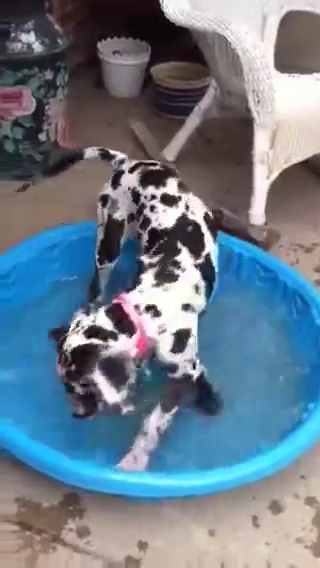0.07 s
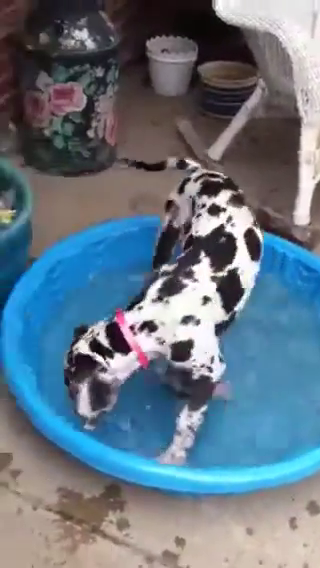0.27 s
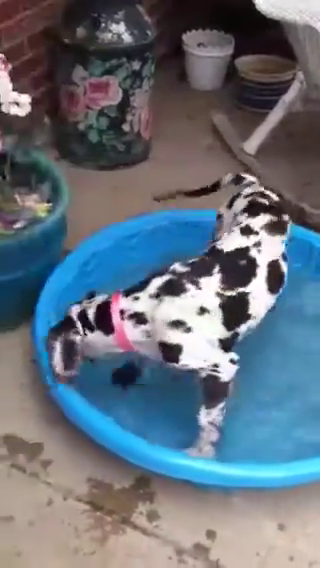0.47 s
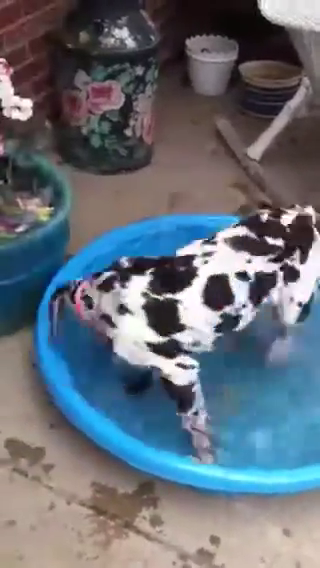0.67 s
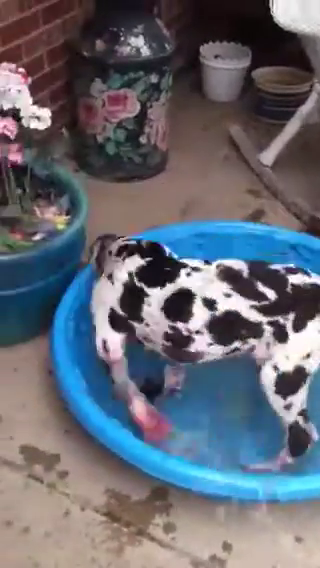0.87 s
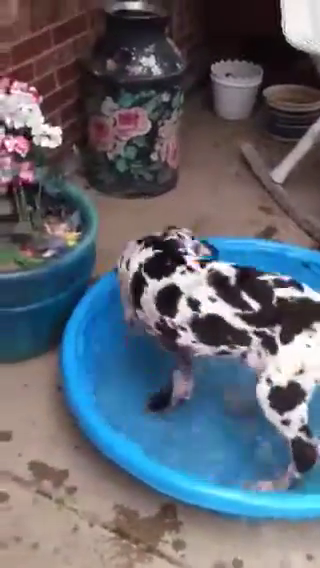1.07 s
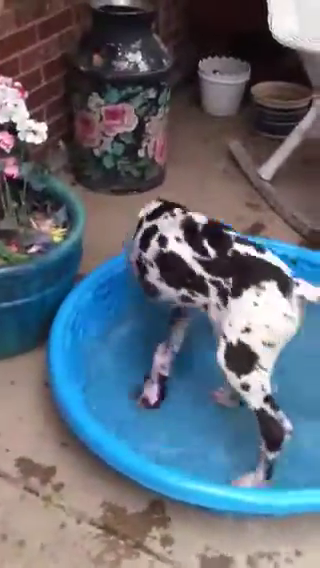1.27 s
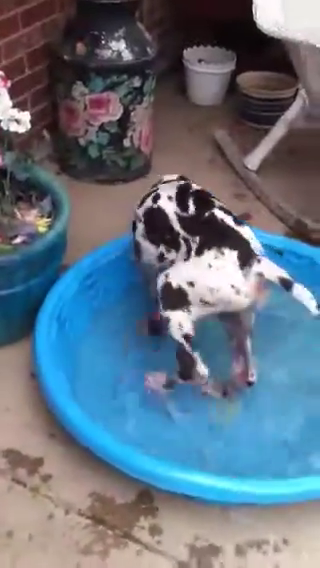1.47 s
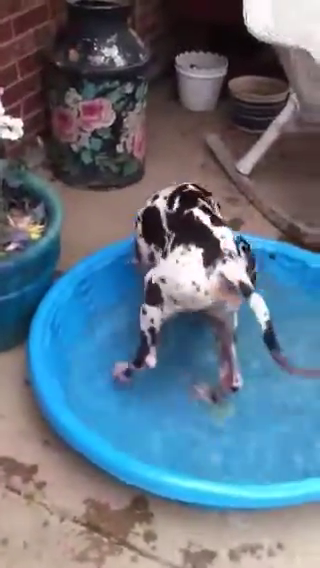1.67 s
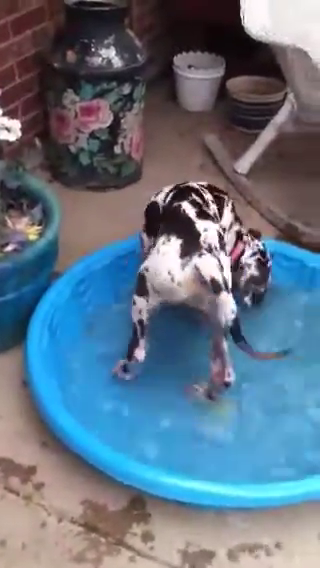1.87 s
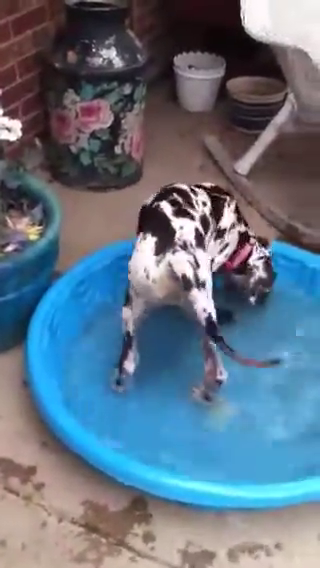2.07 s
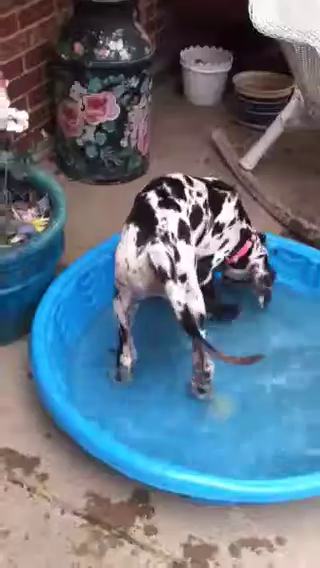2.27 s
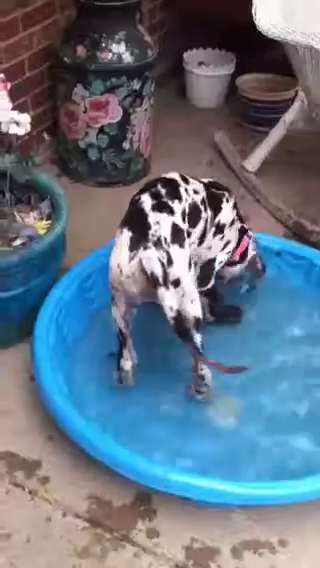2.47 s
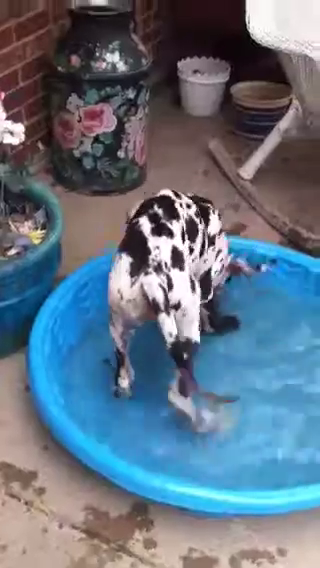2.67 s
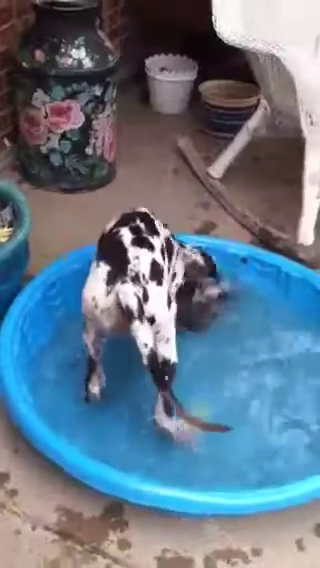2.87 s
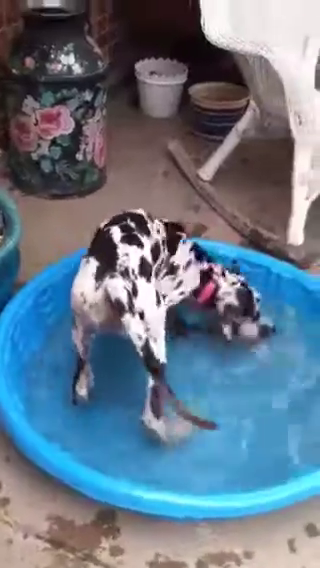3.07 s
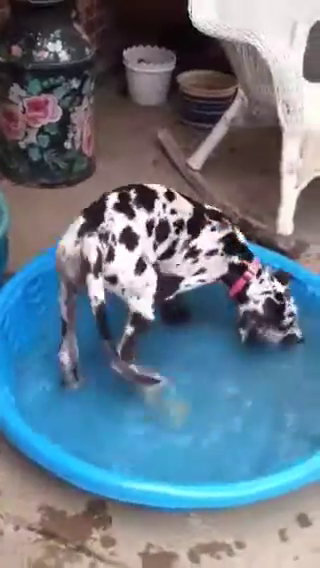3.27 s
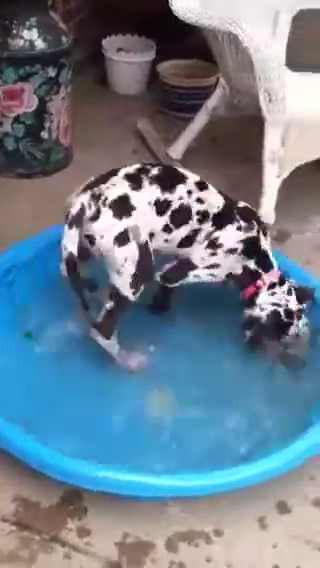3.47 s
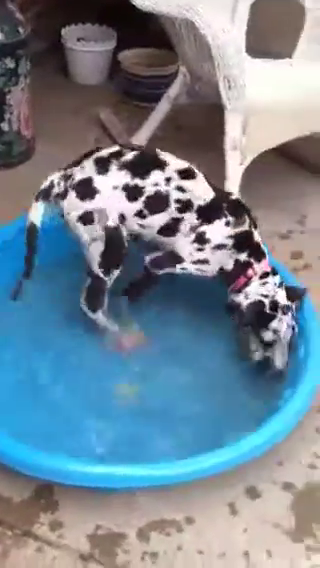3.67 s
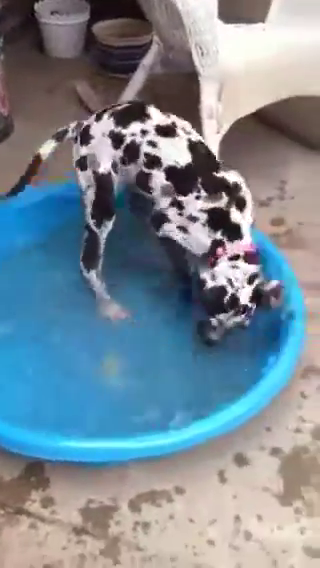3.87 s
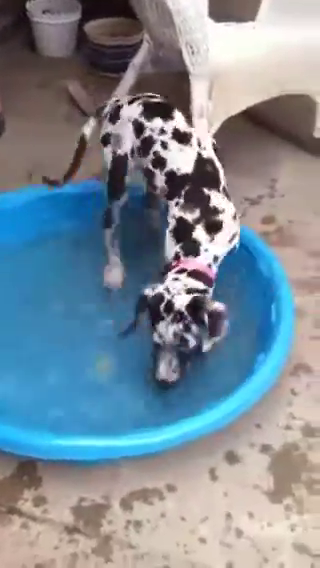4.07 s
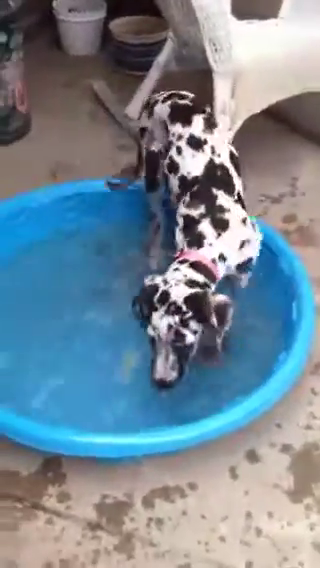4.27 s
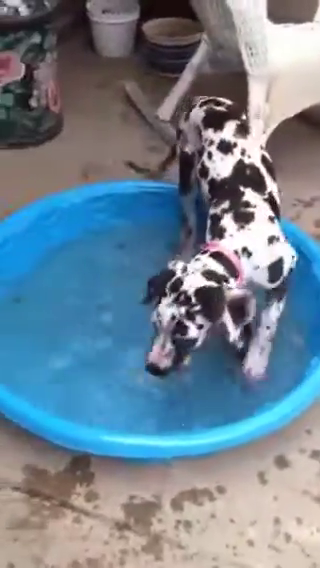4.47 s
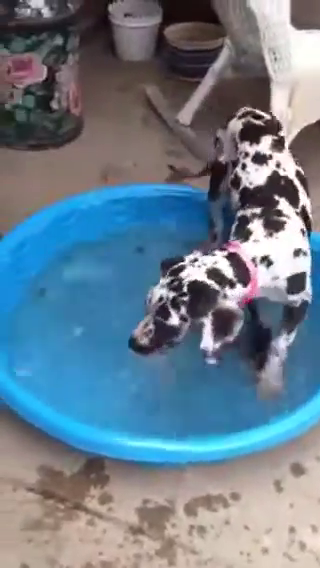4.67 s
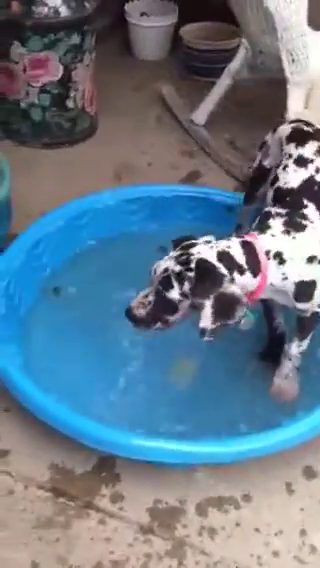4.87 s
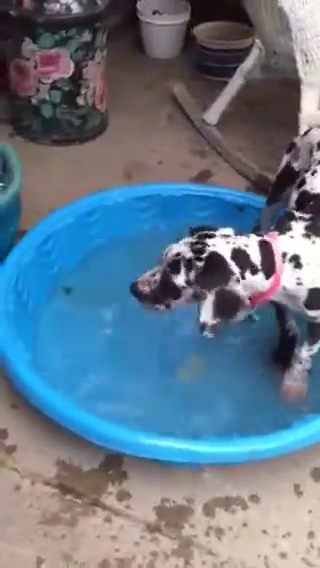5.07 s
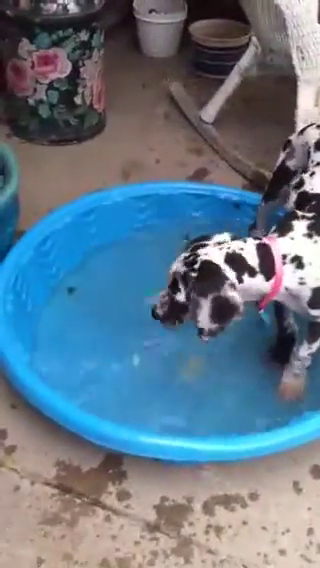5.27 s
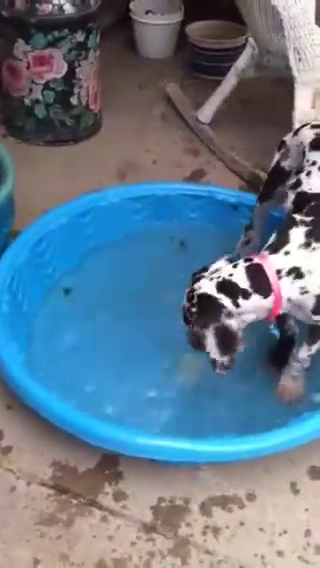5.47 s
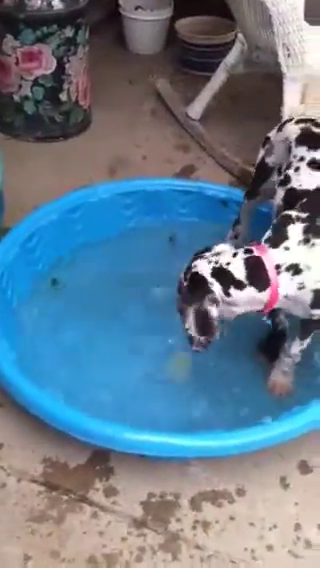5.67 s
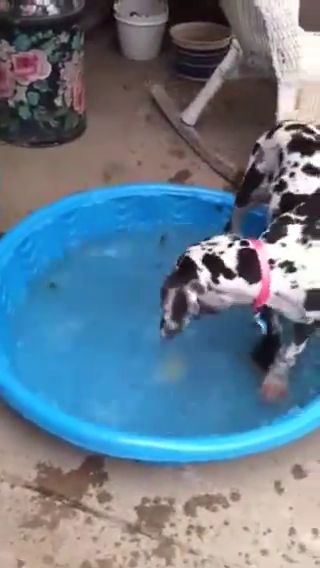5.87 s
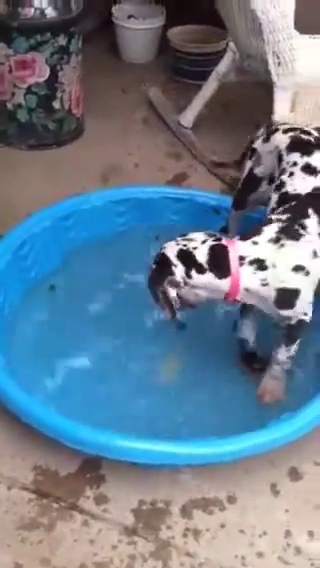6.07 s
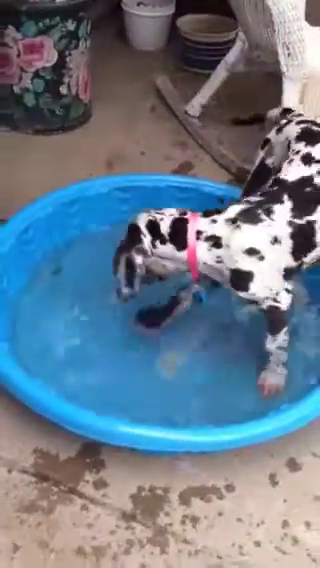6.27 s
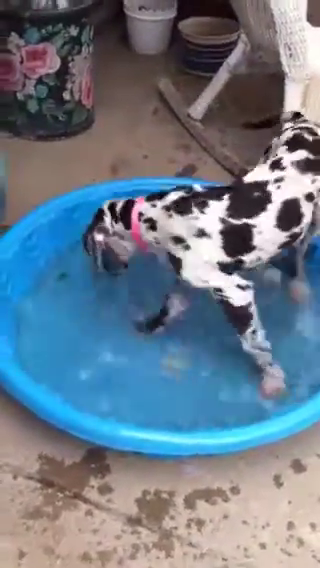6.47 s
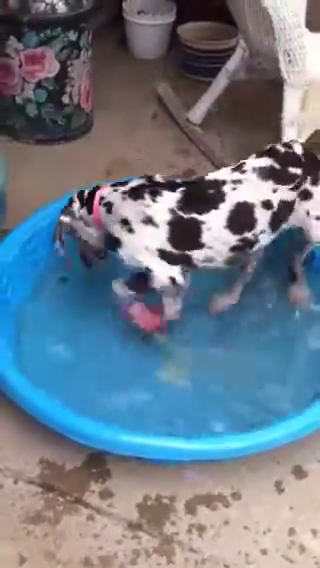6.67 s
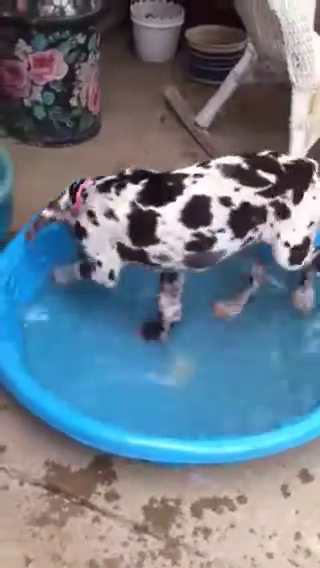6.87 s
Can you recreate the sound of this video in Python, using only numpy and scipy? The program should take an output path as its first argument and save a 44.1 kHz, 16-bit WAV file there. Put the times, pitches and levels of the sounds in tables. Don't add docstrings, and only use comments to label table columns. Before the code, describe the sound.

A dog paws and wades in a shallow plastic pool, wet slaps, bubbling gurgles and hollow tub booms, then quiet drips and one last slap.

```python
import sys
import numpy as np
from scipy import signal
from scipy.fft import rfft, irfft, next_fast_len
from scipy.io import wavfile
from scipy.ndimage import uniform_filter1d, map_coordinates

SR = 44100
rng = np.random.default_rng(int(sys.argv[2]) if len(sys.argv) > 2 else 0)


def magnitude_from_level(level_db):
    exponent = np.asarray(level_db, float) / 20
    return 10 ** exponent


def inscribe(sig):
    pcm = np.round(np.clip(np.atleast_2d(sig).T, -1, 1) * 32767)
    wavfile.write(sys.argv[1], SR, pcm.astype(np.int16))


N = 305613

# start in seconds, hiss level in dB, body over the hiss in dB,
# 60 dB decay in ms.
SLAPS = [(0.0672, -38, 3.5, 53), (0.316, -59.5, 16.5, 120), (0.666, -59, 13, 430), (0.677, -42, -5, 39),
         (0.895, -44, -9, 100), (1.003, -46, 3, 100), (1.2366, -42, -0.5, 77), (1.3696, -46.5, 4, 27),
         (1.3913, -44.5, 5.5, 170), (1.5234, -58, 3.5, 440), (1.6641, -48, -3, 62), (1.716, -57, 13, 98),
         (1.7943, -44, -0.5, 120), (2.0518, -48.5, 1, 39), (2.898, -47, 6, 110), (3.11, -44, 5.5, 30),
         (3.4395, -35.5, -14, 117), (3.474, -41.5, 15, 71), (3.542, -55, 28, 16), (3.844, -48, -10, 87),
         (4.0027, -45, -5, 110), (4.208, -39.5, -14, 164), (4.344, -52.5, 2.5, 230), (5.015, -53, 4.5, 31),
         (5.4731, -60.5, 0, 190), (6.389, -44, -1, 140), (6.5279, -39, 1.5, 86), (6.543, -31, -2.5, 22)]
# start in seconds, hiss level in dB.
PATS = [(0.056, -41), (0.187, -42.5), (0.4773, -54), (0.8768, -42.5), (1.144, -48), (1.6125, -51.5),
        (1.684, -48), (1.869, -47), (3.176, -50), (3.2568, -50), (3.7174, -47), (4.1852, -52), (4.219, -53),
        (4.506, -46.5), (4.61, -49), (4.704, -54), (4.9648, -50.5), (6.793, -50.5)]
PAT_BODY_DB, PAT_T60_MS = 6, 36.7
# start in seconds, hiss level in dB.
SPECKS = [(1.141, -45), (1.5229, -52), (1.5345, -50), (1.978, -60), (2.0532, -48), (4.931, -50),
          (4.975, -52), (5.0287, -55), (5.043, -55), (5.179, -54), (5.209, -53)]
SPECK_BODY_DB, SPECK_T60_MS = -9, 6.7
CRACK_DB, CRACK_T60_MS = -4.5, 8.4
POP_DB, POP_BODY_DB, POP_T60_MS = -35.5, 10, 53

# start in seconds, peak level in dB, pitch in Hz,
# 60 dB decay in ms.
RISING = [(0.089, -33.5, 1390, 7.6), (0.693, -34, 1380, 3.5), (0.8626, -31, 2620, 1.3),
          (1.074, -44, 2270, 9), (1.276, -31, 1980, 4.8), (2.4194, -35.5, 600, 45), (2.427, -37.5, 913, 57),
          (2.695, -36, 800, 1.3), (2.739, -39, 1990, 12), (2.7608, -36.5, 814, 11),
          (3.264, -37.5, 1080, 36), (3.4123, -29.5, 810, 20), (3.6678, -28.5, 700, 17),
          (3.788, -37, 2160, 8), (3.844, -32.5, 1140, 13), (3.8665, -28, 1075, 35), (4.012, -28, 1120, 11),
          (4.109, -35.5, 1135, 30), (4.2068, -32, 1120, 18), (4.647, -42.5, 1020, 5.2),
          (4.7225, -38.5, 2500, 11), (4.826, -42.5, 1860, 12), (4.882, -32.5, 1080, 15),
          (4.904, -33.5, 2000, 18), (4.967, -39, 1400, 29), (6.529, -40.5, 950, 57),
          (6.5435, -19, 3020, 0.81), (6.608, -27.5, 1053, 26), (6.671, -42.5, 1400, 34),
          (6.677, -45.5, 1895, 45), (6.85, -44.5, 718, 38)]
# start in seconds, peak level in dB, pitch in Hz,
# 60 dB decay in ms.
HELD = [(0.262, -44.5, 1180, 41), (0.464, -45.5, 1250, 29), (0.897, -34, 1560, 11), (1.6113, -31, 777, 40),
        (1.72, -40, 2300, 35), (2.04, -34.5, 1290, 9.1), (2.0873, -31.5, 930, 3.3), (2.2872, -33, 935, 11),
        (2.3596, -41.5, 1060, 30), (2.5734, -37, 890, 3.6), (2.6026, -32.5, 800, 47),
        (2.9196, -37.5, 1265, 24), (3.1542, -32.5, 1016, 37), (3.3377, -25, 730, 21),
        (3.4277, -30, 815, 49), (3.5088, -27, 804, 69), (3.5334, -23, 1380, 4.7), (4.2079, -31, 737, 110),
        (4.3453, -32.5, 1070, 4.8), (4.3898, -40, 1980, 21), (4.589, -35, 2240, 4.9),
        (4.7536, -46, 2210, 45), (4.8002, -47.5, 1034, 53), (5.027, -46, 2380, 18), (5.0422, -42, 2150, 11),
        (6.622, -38, 1120, 34), (6.629, -40, 1120, 18), (6.701, -40, 1150, 27), (6.866, -53, 900, 100)]
# start in seconds, peak level in dB, pitch in Hz,
# 60 dB decay in ms.
SINKING = [(0.0695, -35, 1405, 20), (0.3226, -38, 1510, 24), (0.3229, -29, 2670, 0.85),
           (1.2751, -33, 920, 30), (1.515, -41, 2080, 44), (1.6124, -44, 2370, 24), (1.689, -45, 1390, 28),
           (2.7888, -31.5, 1335, 20), (2.8425, -29, 507, 6.1), (3.256, -37, 870, 22),
           (3.3676, -29, 750, 34), (3.4756, -28.5, 740, 26), (3.604, -24.5, 890, 14),
           (3.7138, -32, 1130, 18), (3.9865, -29, 900, 20), (6.2275, -46, 1720, 19),
           (6.3964, -29, 3380, 5.3), (6.6869, -42.5, 2180, 4.3), (6.7983, -37.5, 1700, 2.9)]
GLIDES = [20.3, -0.29, -10]
SWELL_CYCLES = 3.4
# start
# in seconds, peak level in dB, pitch in Hz.
DRIPS = [
    (5.456, -47, 4280),
    (5.74, -51, 1300),
    (5.763, -53, 1920),
    (6.083, -48.5, 4210),
    (6.108, -46.5, 1630),
    (6.173, -49, 1500),
    (6.267, -48, 3060),
    (6.283, -45.5, 5170),
    (6.352, -50, 2880),
         (6.2284, -40, 6560),
]
# start in seconds, peak level in dB, pitch in Hz.
DROPLETS = [(0.0655, -42, 3500), (0.0685, -40, 3060.0), (0.1888, -40, 3300), (0.3366, -44, 3700),
            (0.5065, -43, 4390.0), (0.6795, -42, 5430.0), (0.6917, -44, 3250), (0.6926, -41, 6200),
            (1.3709, -40, 5170), (1.3977, -42, 4050), (1.398, -42, 3550), (1.5344, -45.5, 3200),
            (1.6165, -42, 3050), (1.7351, -43, 3570), (1.7953, -42, 5900), (1.871, -43, 2380),
            (1.9948, -52, 6830), (2.2121, -54, 2060), (2.6022, -45, 1970), (2.7239, -46, 3340),
            (3.1373, -38.5, 3640), (3.1513, -37.5, 2160), (3.2573, -41.5, 4430), (3.448, -36, 5760),
            (3.4746, -34, 3480), (3.6517, -39.5, 2410.0), (3.8463, -37.5, 4340), (4.0022, -32.5, 2080),
            (4.0045, -37, 6330.0), (4.0055, -31, 5180), (4.0804, -39, 6240), (4.21, -41, 6850.0),
            (4.2199, -38.5, 3460), (4.2201, -38, 5250), (4.2207, -37, 2230), (4.3454, -44, 4200),
            (4.3952, -41.5, 3400), (4.6533, -46.5, 4260.0), (4.6827, -47, 3570.0), (4.7803, -48.5, 3440),
            (5.0862, -49, 1950), (5.48, -49.5, 5350), (5.7643, -56, 3270.0), (6.1337, -58, 3500),
            (6.253, -52, 6700), (6.3975, -45, 6160.0), (6.3985, -48, 4600), (6.465, -43.5, 2030),
            (6.5439, -42, 7300), (6.545, -48, 6700), (6.553, -40, 4470), (6.562, -42, 3930),
            (6.576, -46, 4800), (6.6751, -49, 2030), (6.6849, -49, 5300), (6.888, -52, 3370)]
# start in seconds, peak level in dB, pitch in Hz,
# 60 dB decay in ms.
GULPS = [(0.053, -42, 1130, 14), (0.1871, -50, 1540, 29), (0.213, -51, 1540, 19), (0.3417, -47, 880, 16),
         (0.5869, -45, 645, 20), (0.6057, -45, 640, 21), (0.6753, -40, 1153, 35), (0.772, -43, 1070, 8.5),
         (0.7854, -46, 960, 11), (0.8626, -39, 1500, 9), (0.9278, -43, 1410, 28), (1.011, -40, 1210.0, 16),
         (1.0127, -38, 1590.0, 9), (1.041, -44, 1470, 23), (1.074, -41, 1500, 7), (1.1993, -45, 1400, 17),
         (1.2773, -36.5, 1347, 70), (1.284, -41, 660, 25), (1.292, -39, 1000, 20), (1.4749, -43, 1530, 12),
         (1.778, -41.5, 1546, 44), (1.8704, -40, 1000, 10), (2.0176, -45, 1390, 20),
         (2.6159, -47, 1400, 13), (2.675, -41, 1490, 7), (2.71, -38, 1280, 13), (2.802, -40, 1480, 20),
         (2.8416, -42, 1320, 67), (2.905, -38, 990, 10), (2.9593, -37, 714, 15), (2.978, -39, 644, 12),
         (2.986, -38, 2130, 10), (3.018, -37.5, 1180, 15), (3.089, -39.5, 524, 20), (3.109, -36.5, 770, 62),
         (3.128, -41, 1590.0, 7), (3.464, -42, 1300, 12), (3.7318, -36.5, 1090, 12), (4.1095, -41, 830, 54),
         (4.189, -35, 960, 14), (4.3894, -42, 1120.0, 13), (4.6158, -45, 1120, 10), (4.9011, -45, 1240, 42),
         (5.057, -47, 2310, 20), (5.107, -53, 970, 29), (6.461, -46, 1155, 42), (6.758, -48, 1460.0, 15), ]

# start in seconds, peak level in dB, pitch in Hz.
THUMPS = [(0.0085, -29.5, 291), (0.0807, -35, 300), (0.355, -34.5, 355), (0.876, -33, 212),
          (0.9217, -33, 316), (1.2759, -23, 500), (1.295, -25.5, 440), (1.3695, -30, 468),
          (1.9243, -43, 330), (2.405, -28.5, 262), (2.427, -29.5, 300), (2.9414, -34, 364),
          (3.1131, -21.5, 300), (3.4874, -17.5, 273), (3.4921, -17, 252), (4.022, -22.5, 358),
          (4.1379, -31.5, 300), (4.391, -33.5, 387), (6.4648, -49, 360)]
# time of peak in seconds, peak level in dB, pitch in Hz.
KNOCKS = [(0.1368, -44, 338), (0.739, -46, 256), (0.8874, -46, 266), (1.18, -38, 263), (1.4326, -36, 413),
          (1.726, -44, 257), (1.7625, -40, 456), (2.603, -34.5, 490), (2.6718, -41, 430.0),
          (2.9588, -40, 300.0), (3.1637, -35.5, 380), (3.2644, -43, 340.0), (3.507, -23, 368),
          (3.754, -37.5, 254), (3.8438, -34, 550), (3.8806, -36.5, 387), (4.72, -44, 427),
          (4.8794, -44, 390.0), (5.568, -51, 300.0), (6.226, -46.5, 515), (6.4672, -46, 300.0),
          (6.765, -46, 393)]

# time in seconds, agitation in dB,
# fineness in dB of small bubbles over large.
STIR = [(0.0, -57, 11), (0.3, -55, -3), (0.43, -78.5, 14), (0.55, -53, 1), (1.1, -59, 10.5),
        (1.5, -54.5, -2.5), (1.98, -54, -1.5), (2.17, -60, -4), (2.51, -64.5, -0.5), (2.75, -50, -5.5),
        (3.3, -49.5, -4), (3.9, -52.5, 3), (4.5, -54.5, 3.5), (5.06, -66, 7), (5.3, -73, 3),
        (6.36, -73, 4.5), (6.46, -56, -1), (6.92, -72, 14.5)]
# time of peak in seconds, level in dB, fineness in dB,
# time to fall 10 dB in ms.
STROKES = [(0.088, -41, 3, 21), (0.35, -52.5, 0.5, 64), (0.491, -63, 14, 70), (0.68, -59, -12, 82),
           (0.9, -49.5, 5.5, 107), (1.0, -55, 8, 134), (1.283, -37, -6, 26), (1.39, -44.5, -21, 70),
           (1.7, -57, 9.5, 129), (1.919, -43, -3, 30), (2.4, -50, -15, 94), (2.605, -50, -8, 87),
           (2.91, -48, -1, 76), (2.98, -46.5, -3.5, 108), (3.14, -43, -6, 76), (3.34, -47, -3.5, 102),
           (3.46, -36, -3, 116), (3.5, -40.5, 1.5, 38), (3.7, -42.5, -2.5, 124), (3.869, -41.5, 0.5, 85),
           (4.013, -34.5, -0.5, 34), (4.06, -52.5, 14, 95), (4.228, -34.5, -18, 43), (4.892, -43, -9.5, 49),
           (5.117, -55.5, 3, 20), (5.62, -67, 7, 234), (6.26, -66.5, 9, 62), (6.412, -55, 6, 55),
           (6.59, -62.5, 15.5, 48)]
# time of peak in seconds, level in dB, time to fall 10 dB in ms.
WAVES = [(0.0, -43, 150), (0.089, -36.5, 36), (0.27, -49.5, 117), (0.6, -47, 108), (0.902, -32, 42),
         (1.05, -47, 300), (1.29, -44.5, 207), (1.39, -54, 75), (1.84, -49, 85), (1.92, -46.5, 187),
         (2.3, -54.5, 202), (2.43, -47, 40), (2.62, -47, 79), (2.87, -45, 147), (2.98, -45.5, 47),
         (3.14, -43.5, 40), (3.41, -43, 77), (3.502, -29, 65), (3.79, -43, 120), (4.01, -49.5, 200),
         (4.23, -42.5, 139), (4.4, -55.5, 196), (4.89, -47, 70), (5.117, -46.5, 24), (5.62, -62, 350),
         (6.25, -55.5, 27), (6.5, -51, 97), (6.6, -54, 49)]
BUILD_SHARE, HEAVE_SHARE = 0.53, 0.62
SLOSH_DB, SLOSH_FOLLOWS = -10, 0.28
SPRAY_DB, SPRAY_FOLLOWS = -10.5, 1

# frequency in Hz, level in dB per Hz.
SHEET = [(450, -6.5), (1000, -0.5), (2500, 2.5), (5000, -9.5), (12000, -50)]
# frequency in Hz, level in dB per Hz.
SLOSH = [(60, -75), (140, -9), (200, 2), (380, 2.5), (600, -4), (1200, -34)]
# frequency in Hz, level in dB per Hz.
GURGLE = [(250, -10.5), (500, -5), (800, 2), (1300, 1.5), (2000, -4), (4000, -23.5)]
# frequency in Hz, level in dB per Hz.
FROTH = [(900, 1.5), (1700, -0.5), (2400, -1), (4000, -2), (6000, -6.5), (12000, -60)]
# frequency in Hz, level in dB per Hz.
SPRAY = [(2500, -17.5), (4500, -6.5), (6500, -5), (10000, -7), (16000, -10)]
# frequency in Hz, 60 dB decay in seconds.
WALL = [(200, 0.089), (2000, 0.25), (10000, 0.08)]
# frequency in Hz, level in dB per Hz.
AIR = [(18, -26), (30, -23), (62, -15.5), (165, 2), (400, -2.5), (956, -7.5), (1990, -20), (15800, -26.5)]
AIR_DB = -63.5


def unit(x):
    return x / np.sqrt(np.mean(x ** 2) + 1e-20)


def along(points, hz):
    f, v = np.transpose(points)
    return np.interp(np.log(hz + 1), np.log(f + 1), v)


def wobble(rate):
    knots = rng.standard_normal(int(N * rate / SR) + 4)
    return map_coordinates(knots, [np.arange(N) * rate / SR])


def coloured(x, spectrum):
    m = next_fast_len(N + 8192)
    gain = magnitude_from_level(along(spectrum, np.fft.rfftfreq(m, 1 / SR)))
    return irfft(rfft(x, m) * gain, m)[:N]


def rush(spectrum, patchy_db=0):
    z = signal.stft(rng.standard_normal(N + 512), nperseg=256)[2]
    field = uniform_filter1d(rng.standard_normal(z.shape), 4, 0)
    field = uniform_filter1d(field, 6, 1)
    patchy = signal.istft(z * magnitude_from_level(patchy_db * unit(field)), nperseg=256)[1][:N]
    return unit(coloured(patchy, spectrum))


def rings(s, gain, hz, swell, t60, rise, size):
    columns = (s, gain, hz, swell, t60, rise)
    s, gain, hz, swell, t60, rise = (np.asarray(v, float)[:, None] for v in columns)
    t = np.arange(size) / SR
    attack = np.sin(np.pi / 2 * np.clip(t / swell, 0, 1)) ** 2
    decay = magnitude_from_level(-60 * np.clip(t - swell, 0, None) / t60)
    wave = gain * attack * decay * np.sin(2 * np.pi * hz * t * (1 + rise * t / 2))
    at = np.round(s * SR).astype(int) + np.arange(size)
    return np.bincount(at.ravel(), wave.ravel(), N + size + SR)[:N]


def swarm(count, size, hz, octaves, cycles, spread_db):
    when, loud = rng.random((count, 2)).T
    pitch = np.clip(hz * 2 ** (octaves * rng.standard_normal(count)), 100, 15500)
    life = cycles / pitch
    gain = magnitude_from_level(-spread_db * np.log(1.03 - loud))
    return unit(rings(when * N / SR, gain, pitch, 0.083 * life, life, 0.48 / life, size))


def layer(level_db, spectrum, bubbles, share, patchy_db, flutter_db):
    share = np.clip(share, 0, 1)
    noise = np.sqrt(1 - share) * rush(spectrum, patchy_db)
    mix = noise + np.sqrt(share) * unit(coloured(bubbles, spectrum))
    return magnitude_from_level(level_db) * unit(mix * magnitude_from_level(flutter_db))


def heaped(rest_db, s, db, fall_ms, build=BUILD_SHARE):
    coarse = np.arange(0, N, 64)
    late = coarse / SR - s[:, None]
    peaks_db = db[:, None] - 1e4 * np.maximum(late, -late / build) / fall_ms[:, None]
    power = magnitude_from_level(2 * peaks_db).sum(axis=0)
    return 10 * np.log10(magnitude_from_level(2 * rest_db) + np.interp(np.arange(N), coarse, power))


def slaps():
    hiss, body = np.zeros(N + SR), np.zeros(N + SR)
    t = np.arange(SR // 3) / SR
    pats = [(s, db, PAT_BODY_DB, PAT_T60_MS) for s, db in PATS]
    specks = [(s, db, SPECK_BODY_DB, SPECK_T60_MS) for s, db in SPECKS]
    pops = [(s, db + POP_DB, POP_BODY_DB, POP_T60_MS) for s, db, *_ in [*RISING, *HELD, *SINKING]]
    for s, db, body_db, t60_ms in [*SLAPS, *pops, *specks, *pats]:
        start = round(s * SR)
        burst = (1 - np.exp(-t / (t60_ms * 4e-5))) * magnitude_from_level(-60000 * t / t60_ms)
        crack = magnitude_from_level(CRACK_DB - t60_ms / 12 - 60000 * t / CRACK_T60_MS)
        hiss[start:][:len(t)] += magnitude_from_level(db) * (burst + crack)
        body[start:][:len(t)] += magnitude_from_level(db + body_db + 3.0) * burst
    droplets = swarm(count=6000, size=120, hz=7600, octaves=1.0, cycles=1.96, spread_db=7.0)
    spatter = hiss[:N] * layer(0, SPRAY, droplets, 0.44, 0.4, 0)
    return spatter + body[:N] * layer(0, SHEET, droplets, 0.12, 8.2, 0)


def bubbles():
    kinds = zip((RISING, HELD, SINKING), GLIDES)
    s, db, hz, t60_ms, glide = np.transpose([(*row, g) for rows, g in kinds for row in rows])
    swell = SWELL_CYCLES / hz
    pockets = rings(s - swell / 4, magnitude_from_level(db), hz, swell, 1.12 * t60_ms / 1000, glide, size=4000)
    s, db, hz = np.transpose(DRIPS)
    drops = rings(s, magnitude_from_level(db - 3.5), hz, 0.61 / hz, 40 / hz, 0.0029 * hz, size=1200)
    return pockets + drops


def patter():
    s, db, hz = np.transpose(DROPLETS)
    drops = rings(s - 0.5 / hz, magnitude_from_level(db + 2.5), hz, 1.6 / hz, 40 / hz, 0.00087 * hz, size=900)
    s, db, hz, t60_ms = np.transpose(GULPS)
    t60 = (t60_ms + 3) / 1000
    return drops + rings(s - 1.204 / hz, magnitude_from_level(db - 0.5), hz, 3.7 / hz, t60, 2.3 + 0 * s, size=2500)


def thumps():
    knocks = [(s - 1.25 / hz, db + 5.0, hz) for s, db, hz in KNOCKS]
    s, db, hz = np.transpose([*THUMPS, *knocks])
    return rings(s, magnitude_from_level(db - 7.0), hz, 1.93 / hz, 9 / hz, 5.1 + 0 * s, size=3000)


def stirred():
    s, *controls = np.transpose(STIR)
    busy, fine = (np.interp(np.arange(N) / SR, s, c) for c in controls)
    s, db, stroke_fine, fall_ms = np.transpose(STROKES)
    slosh_db = heaped(busy + SLOSH_DB + SLOSH_FOLLOWS * fine, *np.transpose(WAVES), HEAVE_SHARE)
    gurgle_db = heaped(busy, s, db, fall_ms)
    froth_db = heaped(busy + fine, s, db + stroke_fine, fall_ms)
    spray_rest, spray_peaks = busy + 3 + SPRAY_FOLLOWS * fine, db + SPRAY_FOLLOWS * stroke_fine
    spray_db = SPRAY_DB + heaped(spray_rest, s, spray_peaks, fall_ms)
    surge = wobble(35)
    spatter = 1.1 * wobble(130)
    low = swarm(count=700, size=3000, hz=300, octaves=0.496, cycles=16.4, spread_db=0.5)
    middle = swarm(count=2400, size=1300, hz=950, octaves=0.584, cycles=38.4, spread_db=3.5)
    small = swarm(count=2200, size=800, hz=2500, octaves=0.487, cycles=36, spread_db=2.5)
    mist = swarm(count=7000, size=200, hz=7110, octaves=0.56, cycles=7.9, spread_db=4.5)
    return (layer(slosh_db - 2.5, SLOSH, low, 0.42, 2.16, 0.16 * surge)
            + layer(gurgle_db - 3, GURGLE, middle, 0.69, 3.6, surge)
            + layer(froth_db - 3.5, FROTH, small, 0.44, 2.2, 0.88 * surge + spatter)
            + layer(spray_db - 2.5, SPRAY, mist, 0.35, 3.4, 2.0 * surge + spatter))


def wall(x):
    out, step = np.zeros(N + SR), SR // 3
    for a in range(0, N, step):
        hz, t, z = signal.stft(rng.standard_normal(SR // 4), SR, nperseg=256)
        fade = magnitude_from_level(-60 * t / along(WALL, hz)[:, None])
        tail = signal.istft(z * fade, SR, nperseg=256)[1]
        echo = signal.fftconvolve(x[a:a + step], tail / np.linalg.norm(tail))
        out[a + 120:][:len(echo)] += echo
    return out[:N]


def outdoor_hum():
    drift_db = 0.6 * wobble(3)
    return magnitude_from_level(AIR_DB + 1.5 + drift_db) * rush(AIR, 0.47)


def scene():
    sharp = coloured(bubbles() + patter() + slaps(), [(150, -30), (450, 0)])
    echo = magnitude_from_level(-8.5) * wall(sharp)
    water = sharp + echo + thumps() + stirred()
    water = coloured(water, [(70, -24), (170, 0)])
    return (water + outdoor_hum())[None]


def roll_off(x):
    return signal.sosfilt(signal.butter(12, 15880, fs=SR, output="sos"), x)


def record(dry):
    return roll_off(dry)


dry = scene()
out = record(dry)
inscribe(out)
```